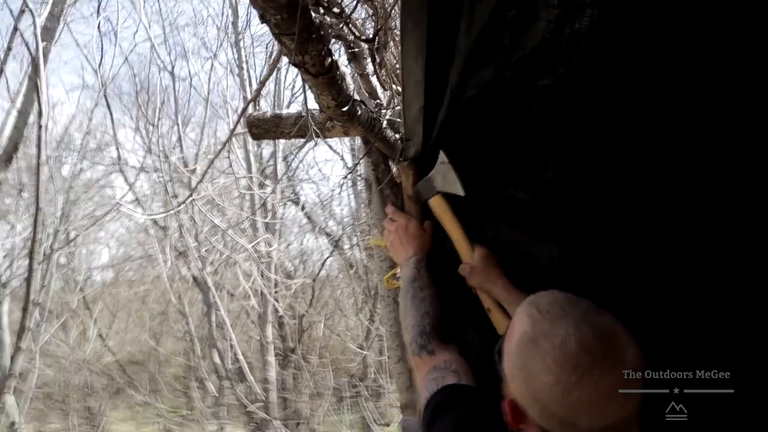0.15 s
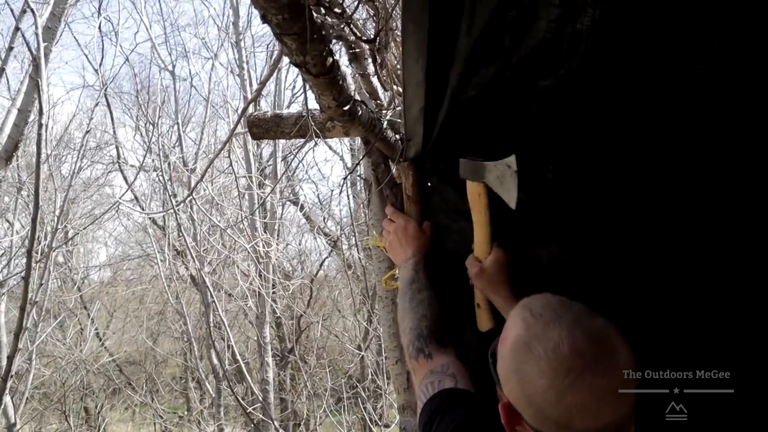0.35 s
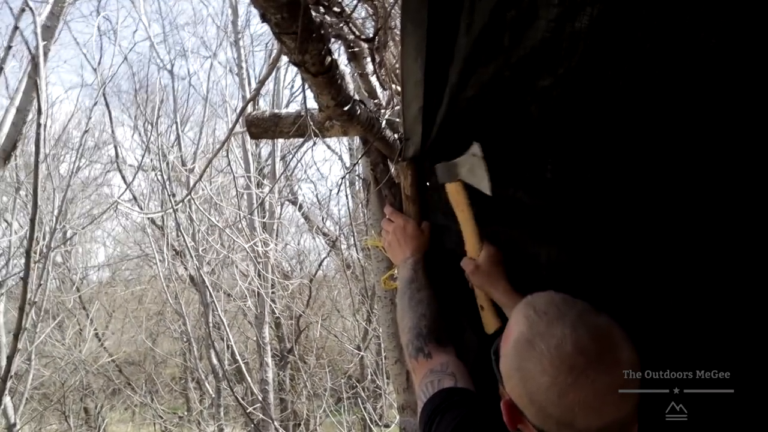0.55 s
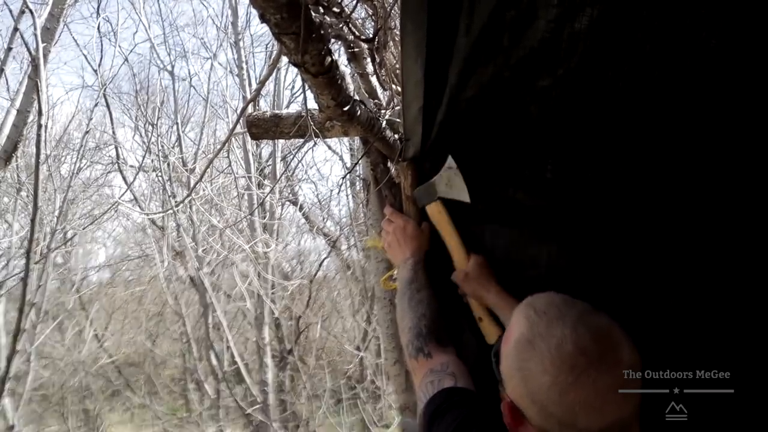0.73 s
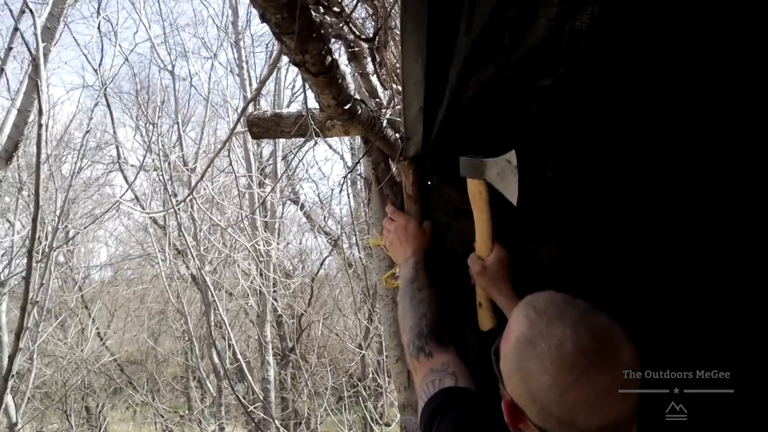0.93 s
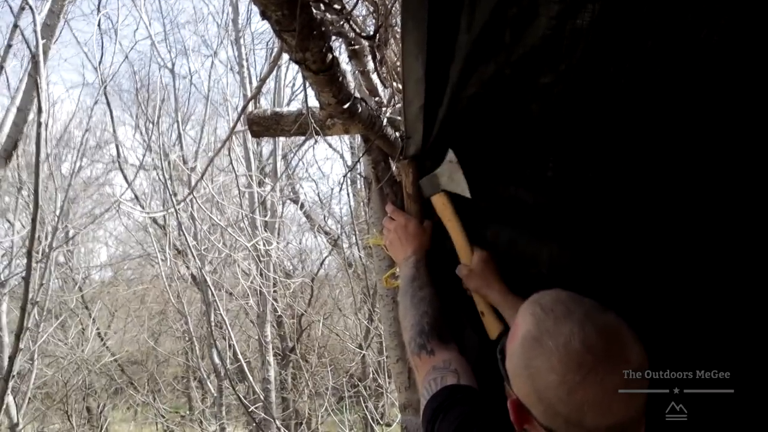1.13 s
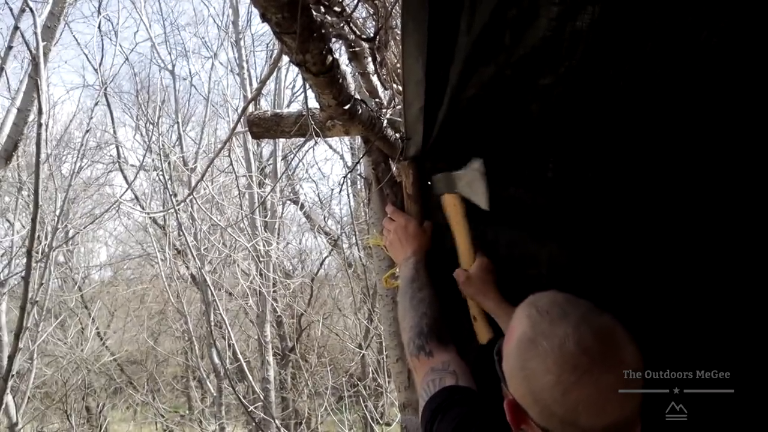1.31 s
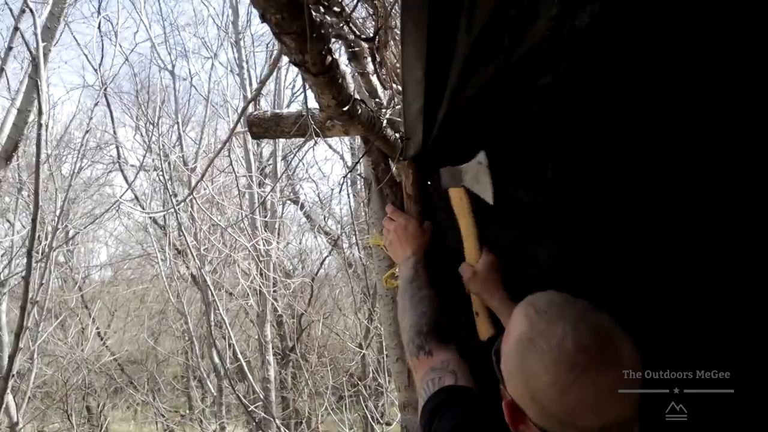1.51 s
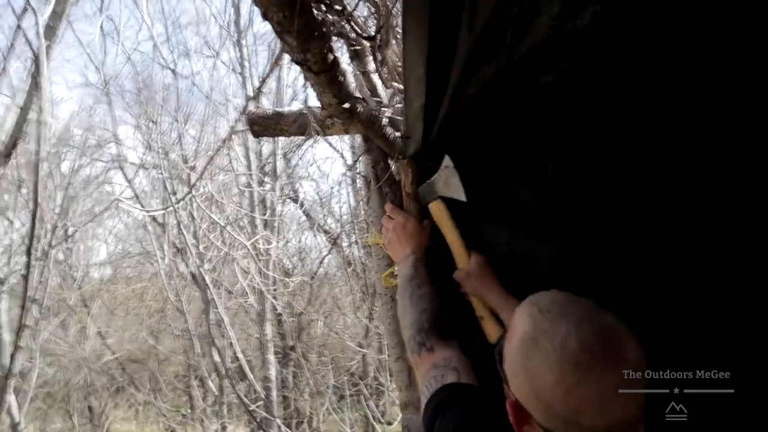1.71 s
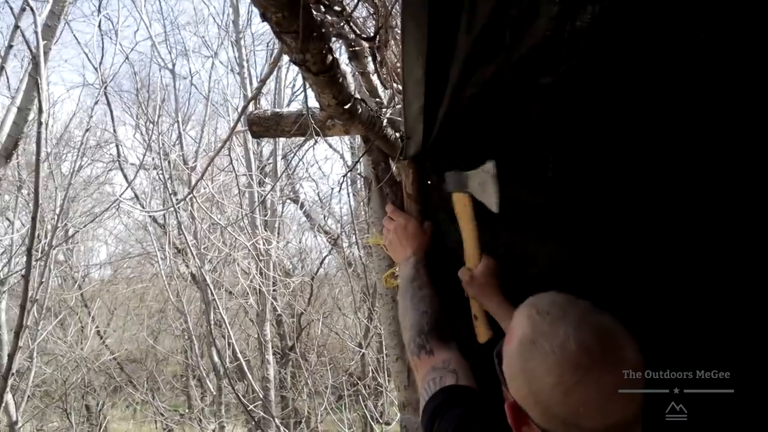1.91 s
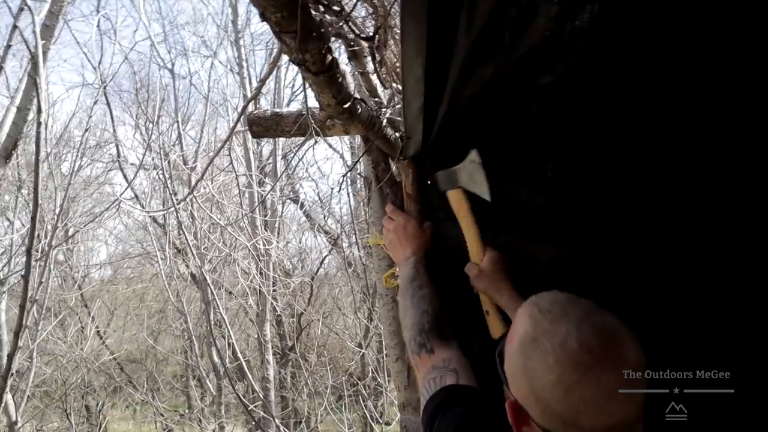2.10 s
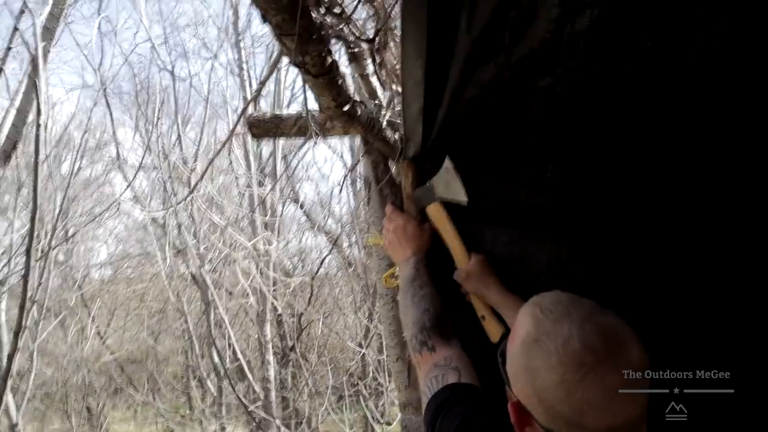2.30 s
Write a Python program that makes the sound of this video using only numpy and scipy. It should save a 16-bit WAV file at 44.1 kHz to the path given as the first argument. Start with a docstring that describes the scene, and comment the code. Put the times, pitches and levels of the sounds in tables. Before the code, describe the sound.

Loud, sharp hammer blows on a nail in wood, evenly spaced, with short woody echoes outdoors

```python
"""The tail of one blow, then seven even blows of a hatchet's back drive a nail into a timber post. Each starts
with a faint lead through the timber, then cracks (filtered noise bursts), thumps (a smooth pulse) and rings
post and steel (decaying sines). The open-sided wooden shelter answers at once in clumped noise, the woods build
later in noise and echoes, and the loose joint chatters after some blows. Beneath lies faint outdoor air (shaped
noise), which the recorder slowly turns down; it clips the peaks."""
import sys
import numpy as np
from scipy import signal
from scipy.fft import rfft, irfft
from scipy.io import wavfile
from scipy.ndimage import uniform_filter1d

SR = 44100
rng = np.random.default_rng(int(sys.argv[2]) if len(sys.argv) > 2 else 0)


def output_pcm(signal):
    """Save a mono or channel-first signal as 16-bit PCM at the path in sys.argv[1].

    Samples are clipped to [-1, 1] before scaling.
    """
    pcm = np.clip(np.atleast_2d(signal).T, -1, 1) * 32767
    wavfile.write(sys.argv[1], SR, np.round(pcm).astype(np.int16))


N = 103635  # samples in the scene

# Colour of the shelter's answer and of the timber lead. Each row: frequency in Hz, density in dB per Hz.
SHELTER_SPECTRUM = [(40, -18), (150, -10), (350, 0), (650, 3), (850, 1), (1200, 2), (2500, -6),
                    (4000, -9.5), (5000, -13.5), (8500, -16), (11200, -12), (13500, -25), (15500, -51)]
# Stereo width of the surroundings. Each row: frequency in Hz, side against mid in dB.
ROOM_WIDTH = [(50, -21), (200, -9), (700, -5.5), (2500, 3.5), (9000, 5.5)]
LEAD_S = 0.0022  # the timber carries the blow this far ahead of the air


def undb(db):
    """Decibels to gain."""
    return 10 ** (np.asarray(db) / 20)


def fade(t, t60):
    """Exponential decay from t = 0, down 60 dB after t60 seconds."""
    return (t >= 0) * np.exp(-np.log(1000) * np.maximum(t, 0) / t60)


def rise(t, seconds):
    """Straight ramp from 0 to 1."""
    return np.clip(t / seconds, 0, 1)


def colour(points, tilt_db=0, count=N):
    """Gain per frequency bin from (Hz, dB) points, tilted in dB per octave above 1 Hz."""
    f = np.maximum(np.fft.rfftfreq(count, 1 / SR), 1)
    hz, db = np.array(points).T
    return undb(np.interp(np.log(f), np.log(hz), db) + tilt_db * np.log2(f))


def left_right(mid, side, width, count=N):
    """Left and right signals from mid and side spectra, the side scaled by a width curve."""
    side = side * colour(width, count=count)
    return irfft(np.array([mid + side, mid - side]), count)


def noise(points, width=ROOM_WIDTH):
    """Steady stereo noise of rms 1 from unrelated mid and side, with a given spectrum and width."""
    mid, side = rfft(rng.standard_normal((2, N))) * colour(points)
    x = left_right(mid, side, width)
    return x / np.std(x)


def burst(points, grain, envelope, width, tilt_db=0, size=400):
    """Stereo burst of set energy: shaped grain, its spectrum evened out, then coloured and widened."""
    count = len(envelope)
    spectrum = rfft(grain * envelope)
    smooth_power = uniform_filter1d(abs(spectrum) ** 2, size)
    mid, side = spectrum / np.sqrt(smooth_power) * colour(points, tilt_db, count)
    x = left_right(mid, side, width, count) * (envelope > 0)
    return x / np.sqrt(np.sum(x ** 2) / 2)


def ring(t, modes):
    """Decaying sine modes, a little different on every blow and at each microphone."""
    scatter_db, detune = 1.0, 0.0008  # typical spread in level, and in pitch as a share
    out = 0
    for hz, db, t60 in modes:
        size, tune, lag = rng.standard_normal(3)
        # the microphones disagree in phase, less so on low modes
        spread = np.array([[1], [-1]]) * lag * min((hz / 3000) ** .3, 1) / 2
        tone = np.sin(2 * np.pi * hz * (1 + detune * tune) * t + spread)
        out = out + undb(db + scatter_db * size) * fade(t, t60) * tone
    return out


def add(out, x, at):
    """Mix x into out from a given time, dropping what falls outside."""
    i = int(at * SR)
    x, i = x[:, max(-i, 0):], max(i, 0)
    n = min(x.shape[1], N - i)
    out[:, i:i + n] += x[:, :n]


def hammering():
    """Every blow takes the same paths to the microphones; only its balance and fine grain change."""
    # The blows, the first just before the start. Each row: start in seconds, then levels in dB of crack,
    # post, thump, shelter, woods, nail ping and head ring, treble tilt in dB per octave, left-right in dB.
    blows = [(-.11, 1, -1, -0.5, 7, 0.5, -15.5, -5, 0.5, -1.5),
             (0.2003, 2.5, 1.5, 0.5, -2, 3.5, -18, -5.5, -0.5, -1),
             (0.5148, 3.5, 3, -12.5, 0, 0, -17, -12.5, 0, 0),
             (0.8223, 2, 2.5, 0.5, -0.5, -1.5, -10, -13.5, 0, -.5),
             (1.1304, -0.5, 0.5, -4, 0.5, -3, -6, -14.5, 0.5, 0),
             (1.4416, 1.5, 1, -28, 0.5, -2.5, 4, -4.5, 0, 0.5),
             (1.7562, 0, 1.5, -24, -2, -3.5, -13.5, -1.5, 0.5, 0),
             (2.0533, -0.5, 0, -31.5, -2, -2, -11.5, -7, 0.5, 0)]
    # Colours of the woods' wash and of their echoes. Each row: frequency in Hz, density in dB per Hz.
    woods_spectrum, echo_spectrum = [(60, -11.5), (250, -3.5), (600, 5), (1100, 3.5), (2500, 3),
                                     (4000, -3.5), (7000, -9.5), (11500, -29.5), (13000, -26), (15000, -47)], [(60, -3), (150, 3), (320, 1.5), (600, -12.5),
                                                    (1200, -13), (2600, -20.5), (5000, -31.5),
                                                    (12000, -35.5), (15000, -67)]
    same_share = 0.97  # share of the grain's power common to all blows
    out = np.zeros((2, N))
    t = np.arange(SR * 3 // 4) / SR - LEAD_S
    octaves = np.log2(np.maximum(np.fft.rfftfreq(len(t), 1 / SR), 200) / 2000)  # about 2 kHz
    textures = [noise(s) for s in (SHELTER_SPECTRUM, woods_spectrum, echo_spectrum)]
    textures += list(rng.standard_normal((3, 2, N)))  # white grain of crack, roof and walls

    for at, crack_db, post_db, thump_db, shelter_db, woods_db, nail_db, head_db, tilt_db, pan_db in blows:
        start = rng.integers(len(t), N - len(t))
        grains = [np.sqrt(same_share) * x[:, :len(t)]
                  + np.sqrt(1 - same_share) * x[:, start:start + len(t)] for x in textures]
        timber_grain, wash_grain, echo_grain, crack_grain, roof_grain, wall_grain = grains

        blow = undb(crack_db) * crack(t, timber_grain, crack_grain, roof_grain)
        blow = blow + undb(post_db) * post(t, thump_db)
        blow = blow + steel(t, nail_db, head_db)
        blow = blow + undb(shelter_db) * shelter(t, wall_grain)
        blow = blow + undb(woods_db) * woods(t, wash_grain, echo_grain)

        blow = irfft(rfft(blow) * undb(tilt_db * octaves), len(t))
        blow = blow * rise(t[-1] - t, t[-1] / 2)  # the second half fades to nothing
        blow = blow + undb(thump_db) * thump(t)
        pan = undb(np.array([[pan_db], [-pan_db]]) / 2)
        add(out, blow * pan, at - LEAD_S)
    return out


def crack(t, timber_grain, crack_grain, roof_grain):
    """Sharp contact noise: a lead through the timber, the crack, and a bright first roof reflection."""
    # Colour of the crack. Each row: frequency in Hz, density in dB per Hz.
    crack_spectrum = [(60, -17), (250, -3), (550, 1.5), (850, 4), (1200, 2), (2650, 6.5), (3400, -0.5),
                      (5200, -4), (7200, -1), (8200, -10), (11200, -1), (12800, -6), (16000, -36)]
    # Stereo width of the crack. Each row: frequency in Hz, side against mid in dB.
    crack_width = [(200, -8), (700, -12.5), (2000, -5.5), (4500, -9), (8000, -1.5), (12000, 3.5)]
    lead_db, crack_db, roof_db = -16, 13, 2
    crack_t60_s, roof_t60_s = 0.014, 0.008  # decay of the shaping envelopes
    roof_delay_s, roof_tilt_db = 0.0037, 4  # tilt per octave
    lead = timber_grain * rise(t + LEAD_S, LEAD_S) * (t < 0)
    snap = burst(crack_spectrum, crack_grain, fade(t, crack_t60_s), crack_width)
    roof_envelope = fade(t - roof_delay_s, roof_t60_s)
    roof = burst(crack_spectrum, roof_grain, roof_envelope, crack_width, roof_tilt_db)
    return undb(lead_db) * lead + undb(crack_db) * snap + undb(roof_db) * roof


def post(t, thump_db):
    """The nailed post: a short low knock that partly follows the thump, and its ringing modes."""
    # Modes of the post. Each row: frequency in Hz, relative level in dB, t60 in seconds.
    post_modes = [(216, -24, .19), (275, -29, .14), (477, -26, .12), (595, -26, .12), (674, -30, .12),
                  (1084, -29, .14), (1157, -30, .13), (1328, -28, .1), (1487, -30, .1), (1756, -30, .13),
                  (2165, -29, .11), (2510, -33, .1), (3046, -32, .1), (3711, -29, .1)]
    modes_db, knock_db, knock_hz, knock_t60_s = -1, -5, 328, 0.016
    knock_follow = 0.12  # share of the thump's dB that the knock follows
    lead_lag = 0.35 * np.array([[1], [-1]])  # radians ahead in one microphone, behind in the other
    knock = np.cos(2 * np.pi * knock_hz * t + lead_lag) * fade(t, knock_t60_s)
    return undb(knock_db + knock_follow * thump_db) * knock + undb(modes_db) * ring(t, post_modes)


def thump(t):
    """One low thump as the blow overloads the microphone: a smooth pulse, high-passed."""
    level_db, peak_s, delay_s, cut_hz = -6, 0.0009, 0.00014, 35
    push = np.maximum(t - delay_s, 0) / peak_s
    pulse = push * np.exp(1 - push)
    return -undb(level_db) * signal.lfilter(*signal.butter(2, cut_hz, "high", fs=SR), pulse)


def steel(t, nail_db, head_db):
    """Steel modes: the nail pings at once, the hatchet head's ring swells in."""
    # Modes of nail and hatchet head. Each row: frequency in Hz, relative level in dB, t60 in seconds.
    nail_modes, head_modes = [(2637, -34, .26), (13245, -32, .14), (13857, -43, .14)], [(5136, -50, .7), (8990, -41, .28)]
    head_swell_s = 0.13
    nail = ring(t, nail_modes)
    head = ring(t, head_modes) * rise(t, head_swell_s)
    return undb(nail_db) * nail + undb(head_db) * head


def shelter(t, grain):
    """Close reflections from the shelter: clumped noise that builds, holds and decays."""
    level_db, build_s, hold_s, t60_s = 11, 0.0014, 0.013, 0.12
    envelope = rise(t, build_s) * fade(np.maximum(t - hold_s, 0), t60_s)
    return undb(level_db) * burst(SHELTER_SPECTRUM, grain, envelope * clumps(t), ROOM_WIDTH, size=120)


def clumps(t):
    """Uneven gain, gliding to a new random level every millisecond or so: reflections come in clumps."""
    depth_db, step_s = 2.5, 0.0014
    steps = rng.standard_normal(2000)
    return undb(depth_db * np.interp((t - t[0]) / step_s, np.arange(len(steps)), steps))


def woods(t, wash_grain, echo_grain):
    """The woods' late answer: a slowly building diffuse wash, and echoes from trunks and ground."""
    # Echoes. Each row: delay in seconds, level in dB.
    echo_taps = [(0.04, -29), (.062, -35.5), (.081, -45), (.095, -38), (0.119, -38.5), (.133, -48.5),
                 (.146, -45.5)]
    wash_db, wash_build_s, wash_t60_s = -38.5, 0.03, 0.5
    echo_rise_s, echo_t60_s = 0.00069, 0.053
    wash = undb(wash_db) * wash_grain * rise(t, wash_build_s) * fade(t, wash_t60_s)
    echo_envelope = 0
    for delay, db in echo_taps:
        onset = rise(t - delay + echo_rise_s, echo_rise_s)
        echo_envelope = echo_envelope + undb(db) * onset * fade(np.maximum(t - delay, 0), echo_t60_s)
    return wash + echo_grain * echo_envelope


def chatter():
    """Short dry rattles of the loose joint after some blows: band-shaped noise with quick decays."""
    # Rattles. Each row: start in seconds, level in dB.
    rattles = [(0.544, -26), (.8425, -13.5), (0.8603, -20), (2.069, -23.5)]
    # Colour of the rattles. Each row: frequency in Hz, density in dB per Hz.
    rattle_spectrum = [(500, -25), (2500, -12), (3600, 0), (4400, -5), (5200, -15), (12000, -24),
                       (15000, -45)]
    rise_s, t60_s = 0.0024, 0.028
    t = np.arange(N) / SR
    envelope = sum(undb(db) * rise(t - at, rise_s) * fade(t - at, t60_s) for at, db in rattles)
    return noise(rattle_spectrum) * envelope


def air():
    """Faint open air: noise, mostly low rumble, slowly turned down by the recorder."""
    # Colour of the air. Each row: frequency in Hz, density in dB per Hz.
    air_spectrum = [(15, -33), (25, 6.5), (318, -10.5), (673, -14.5), (879, -12), (1240, -21), (4380, -34),
                    (5280, -40), (6370, -45.5), (11800, -40), (15000, -75.5)]
    # Stereo width of the air. Each row: frequency in Hz, side against mid in dB.
    air_width = [(50, -24.5), (300, -13.5), (2000, 5), (9000, 8.5)]
    start_db, db_per_s = -49, -3
    return undb(start_db + db_per_s * np.arange(N) / SR) * noise(air_spectrum, air_width)


def scene():
    """Hammering and the joint's chatter in the open air."""
    return hammering() + chatter() + air()


def record(dry):
    """The recorder clips the peaks, dulls the highest treble and cuts the top steeply."""
    clip_level, dull_hz, top_hz = 0.9, 14000, 16400
    clipped = np.clip(dry, -clip_level, clip_level)
    soft = signal.sosfilt(signal.butter(3, dull_hz, fs=SR, output="sos"), clipped)
    return signal.sosfilt(signal.ellip(8, .2, 70, top_hz, fs=SR, output="sos"), soft)


dry = scene()
out = record(dry)
output_pcm(out)
```